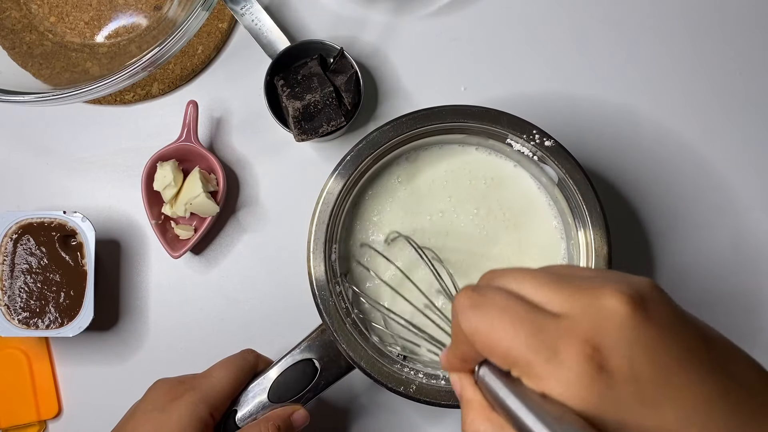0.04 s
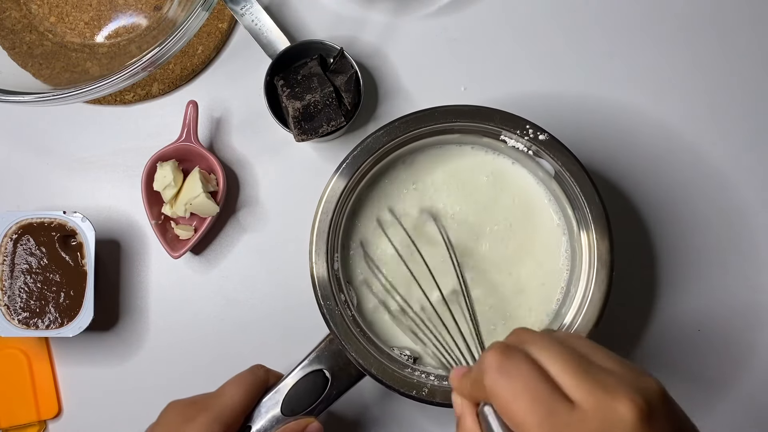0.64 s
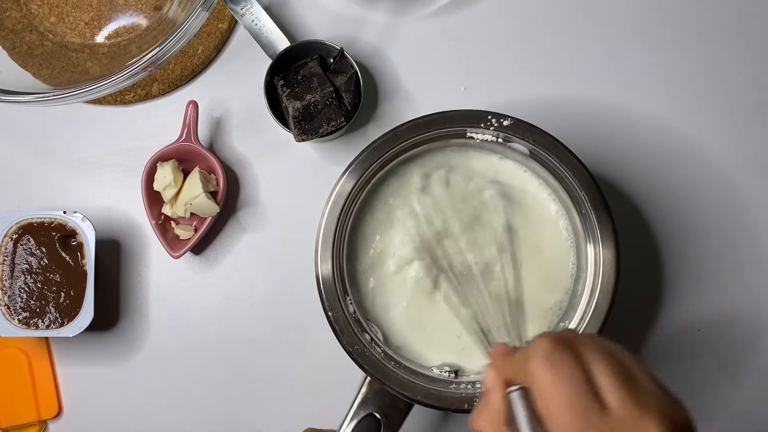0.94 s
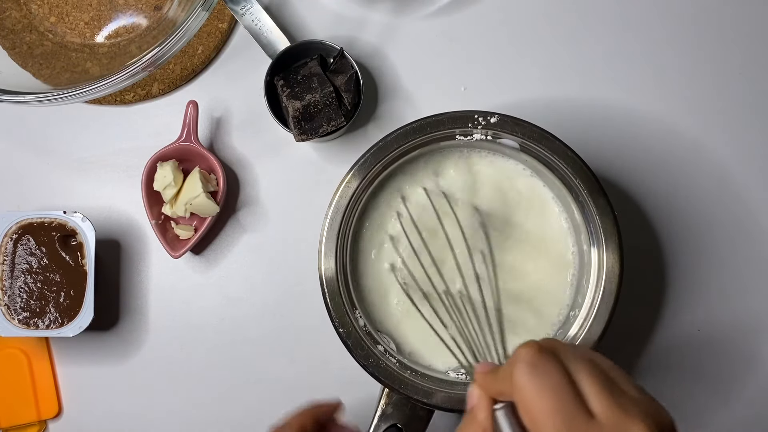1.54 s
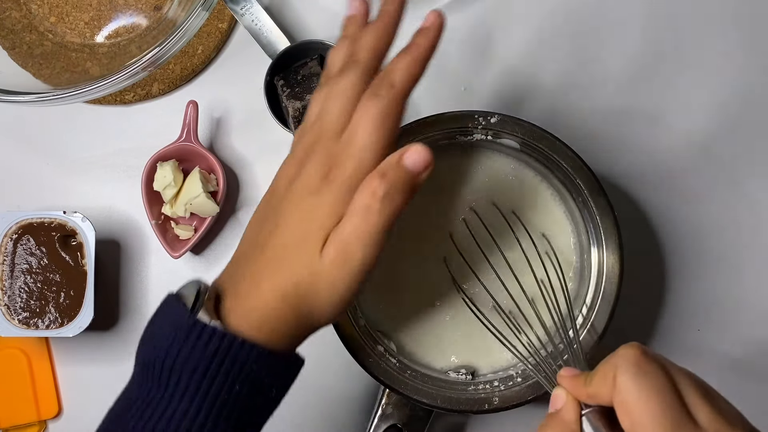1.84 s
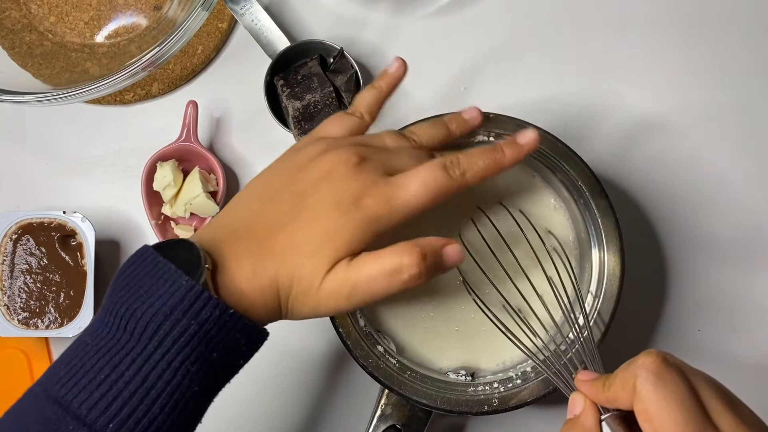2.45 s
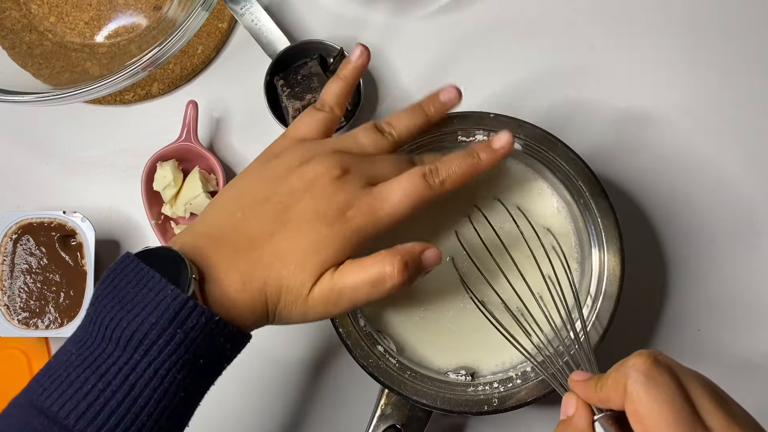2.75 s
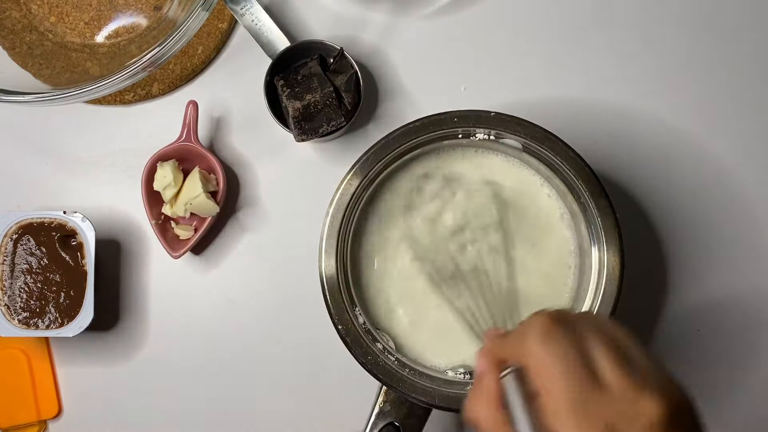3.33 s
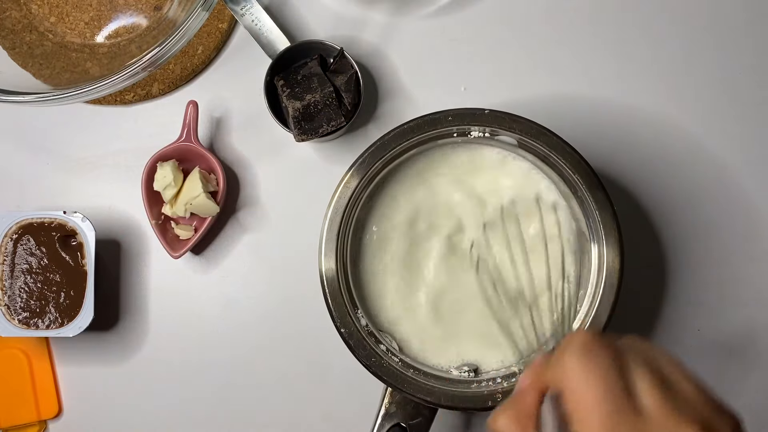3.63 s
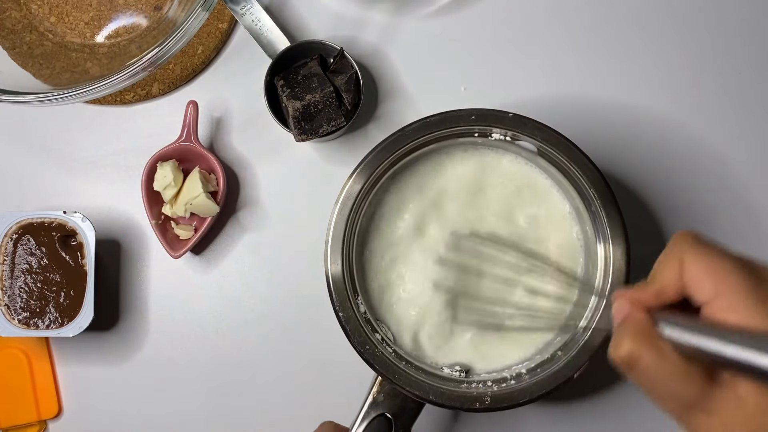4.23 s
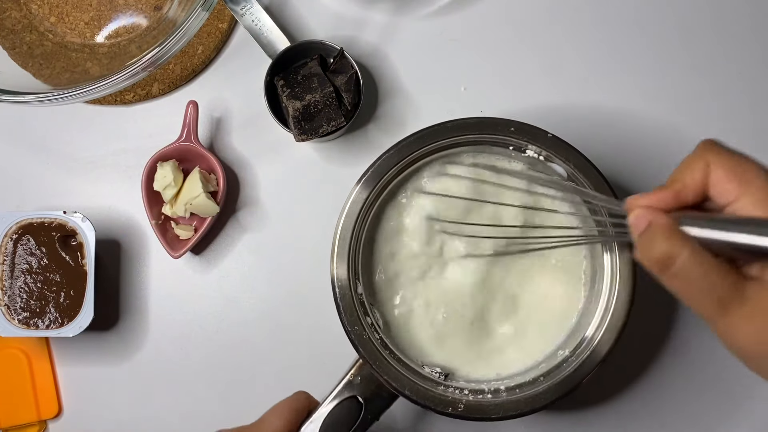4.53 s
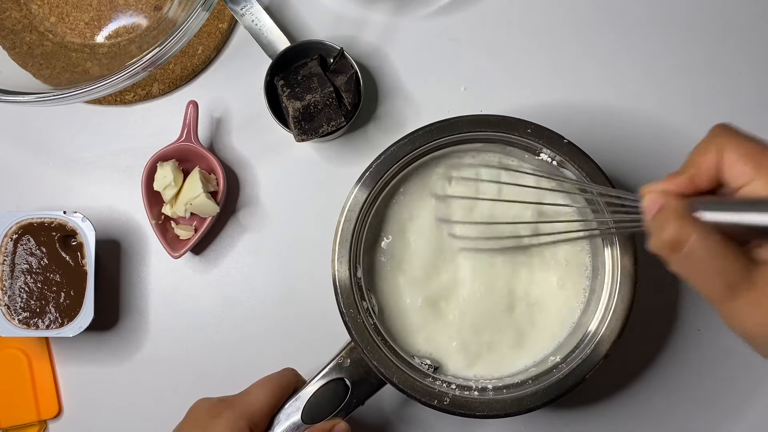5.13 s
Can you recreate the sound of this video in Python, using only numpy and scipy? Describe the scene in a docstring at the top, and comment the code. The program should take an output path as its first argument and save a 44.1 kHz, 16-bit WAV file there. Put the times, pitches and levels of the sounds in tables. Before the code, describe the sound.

A wire whisk stirs sauce in a steel saucepan, clacking and scraping quickly, with a short pause midway.

```python
"""A kitchen worktop, close by: a wire whisk stirs a milky sauce in a steel saucepan.
About four times a second an impact on the wall excites the damped modes of pan and wire loops.
Between impacts, the wires scrape the bottom by stick-slip friction and churn the sauce.
The blows drive a soft, low boom in the worktop. Midway the stirring stops for about a second,
and the resting whisk only ticks and rubs."""
import sys
import numpy as np
from scipy import signal
from scipy.fft import rfft, irfft, next_fast_len
from scipy.io import wavfile
from scipy.ndimage import uniform_filter1d

SR = 44100
rng = np.random.default_rng(int(sys.argv[2]) if len(sys.argv) > 2 else 0)


def log_audio(samples):
    """Write samples as a 16-bit WAV file to the path given in sys.argv[1]."""
    # one column per channel
    frames = np.atleast_2d(samples).T
    # limit to full scale, then quantise
    limited = np.clip(frames, -1, 1)
    pcm = np.round(limited * 32767).astype(np.int16)
    wavfile.write(sys.argv[1], SR, pcm)


N = 237238
TIME = np.arange(N) / SR

# The impact that opens each turn: t/s, wall level/dB, wire level/dB, tick level/dB, wall f/Hz,
# wall T60/s (referred to WALL_HZ), favoured overtone f/Hz, lag of the trailing wires/s,
# their relative level/dB, worktop level/dB, worktop rise time/s
STROKES = [(.399, -50, -45.5, -54, 1108, 0.048, 3600, .014, 1.5, -44, 0.051),
           (.758, -42.5, -40, -38.5, 1110, .056, 4300, 0.029, -4, -42.5, 0.042),
           (.998, -46.5, -38, -39, 1050, 0.052, 5340, 0.037, -1.5, -37, 0.081),
           (1.23, -36, -35, -29.5, 1052, 0.045, 5500, 0.0088, -6, -32.5, 0.082),
           (1.455, -33, -27.5, -25.5, 1100, .056, 5070, .004, -23, -27, 0.055),
           (2.963, -48, -33, -26.5, 940, 0.048, 4100, 0.0074, -6, -46, 0.043),
           (3.16, -42, -37.5, -28.5, 1096, 0.087, 5870, 0.0038, -2.5, -32.5, 0.056),
           (3.384, -37, -36, -32, 1096, 0.052, 1700, .005, -1, -66, 0.021),
           (3.631, -36.5, -44, -36.5, 1067, .056, 1680, 0.012, -1.5, -32, 0.062),
           (3.857, -38, -36.5, -35, 1054, 0.072, 1730, .007, -10.5, -37.5, 0.054),
           (4.077, -28, -33, -25.5, 1113, 0.076, 8260, .0042, -21, -31, 0.048),
           (4.381, -36.5, -35, -34.5, 1104, 0.043, 1610, .046, -7, -25, 0.085),
           (4.604, -32, -29, -26.5, 1330, 0.02, 5240, 0.0078, -6, -38, 0.04),
           (4.785, -50, -43.5, -30, 1286, .03, 11400, 0.026, -9.5, -50, 0.076),
           (5.022, -31.5, -33.5, -28, 1290, 0.042, 10100, .0085, -7.5, -38, 0.021),
           (5.218, -40.5, -40, -37.5, 1170, 0.028, 12400, .011, 6.5, -41.5, 0.046)]
# Light touches of single wires: t/s, wire level/dB, favoured overtone f/Hz, worktop level/dB
TOUCHES = [(0.027, -33, 3300, -46.5), (.118, -44.5, 1890, -53), (.21, -44, 3640, -53),
           (.302, -53, 2250, -60), (.466, -42, 3970, -51), (1.617, -51, 2550, -35), (1.786, -44, 1620, -69),
           (1.994, -54, 4800, -35), (2.139, -56.5, 5070, -34.5), (2.346, -65, 2560, -41.5),
           (2.642, -61.5, 2580, -44.5), (3.459, -39, 3000, -45), (4.19, -39.5, 1600, -42.5)]
# Normal modes of the steel pan: f/Hz, level/dB, T60/s
PAN_MODES = [(560.4, -29.5, 0.38), (1636, -12.5, 0.069), (1803, -15.5, 0.054), (2070, -8.5, 0.045),
             (2512, -14, 0.043), (3143, -11.5, 0.023), (4030, -20.5, 0.027), (5477, 2, 0.0079),
             (10930, -8, 0.017)]
# Dense modes of the wire loops: f/Hz
WIRE_HZ = np.geomspace(1400, 15500, num=90) * rng.uniform(.98, 1.02, 90)
# Long, thin ringing tones of the whisk's free wire loops: f/Hz
LOOP_RING_HZ = [873, 1519, 2009, 2660, 2932, 3965]
# Vigour of the hand (slow start, rest, brisk turns): t/s, level/dB
VIGOUR = [(0, -49), (.3, -58.5), (.6, -52.5), (1.05, -44), (1.35, -40.5), (1.53, -54), (1.68, -46.5),
          (1.86, -77), (2.89, -90), (2.96, -43), (3.3, -44.5), (3.55, -36.5), (4.0, -43), (4.28, -43.5),
          (4.7, -42), (5.38, -42)]
# Wires sliding slowly: centre t/s, level/dB, duration/s, favoured overtone f/Hz, tilt/(dB per octave)
RUBS = [(2.251, -70.5, 0.046, 1600, -4.5), (2.461, -60, 0.04, 2590, 5)]
# Wires slapping through the surface: t/s, level/dB, favoured f/Hz
SPLATS = [(0.646, -49.5, 1690), (1.128, -44.5, 1340), (3.268, -42, 1490), (3.531, -38.5, 1630),
          (3.734, -38, 1580), (3.984, -39.5, 1700), (4.812, -36, 1270), (5.133, -41.5, 2000),
          (5.283, -37.5, 1150)]
# Pairs of pan tones brought out by the sloshing sauce: centre t/s, level/dB, lower f/Hz, duration/s
GURGLES = [(1.641, -48, 520, 0.016), (3.081, -44, 2022, 0.04), (3.531, -38, 1570, 0.085),
           (3.768, -40.5, 1609, 0.049), (4.023, -42.5, 1805, 0.039)]
# Spectral envelopes of the sources: f/Hz, relative level/dB
CONTACT_SPECTRUM = [(100, -12), (750, -7), (1200, -7.5), (5500, 1), (8500, 3.5), (10000, -2.5),
                    (12200, 2.5), (16000, -12.5)]
CHURN_SPECTRUM = [(300, -2), (750, -7.5), (1150, 4.5), (2000, 1), (4400, 0), (6000, -6.5), (12000, -83)]
SCRAPE_SPECTRUM = [(1000, -27), (3400, -11), (5300, 12.5), (7000, 4.5), (12000, 3), (16000, -6.5)]
RUB_SPECTRUM = [(1000, -11), (2800, 4), (12000, 7.5)]
SLOSH_SPECTRUM = [(100, 9.5), (500, -12.0), (2000, -64.0)]
AMBIENT_SPECTRUM = [(55, -4.5), (100, -2.5), (170, -11.5), (500, -21.5), (1200, -39), (5000, -45.5),
                    (11000, -44), (16000, -65)]
# Reverberation time of the kitchen: f/Hz, T60/s
ROOM_T60 = [(1100, 0.16), (2500, 0.18), (16000, 0.19)]
# Reflections that differ at the two microphone ports: f/Hz, relative level/dB
SIDE_SPECTRUM = [(100, -30), (250, -6), (600, -3), (1100, -15), (1900, -12), (2700, -3), (4600, -5),
                 (5500, -14)]
# Phase lead of the left port over the right: f/Hz, phase/rad
LEFT_LEAD = [(2700, 0), (3300, .7), (4900, .15), (7300, 3.1), (13400, 9.4), (16000, 12.6)]
# Level of the left port over the right: f/Hz, level/dB
LEFT_BALANCE = [(320, 0.53), (2000, -0.0094)]

WALL_HZ, TRAILING_WALL_HZ = 1143, 1075  # wall pitch under a light touch and under the trailing wires


def whisk(trailing_wall_db=-3, touch_wall_db=-16.5, touch_wall_t60=0.036):
    """Impact excitation: leading, then trailing wires strike in each turn; light touches fall between."""
    out = np.zeros(N)
    for s, wall_db, wire_db, tick_db, wall_hz, t60, overtone_hz, lag_s, trailing_db, _, _ in STROKES:
        add(out, s, clack(wall_db, wire_db, tick_db, wall_hz, t60, overtone_hz))
        trailing = clack(wall_db + trailing_wall_db, wire_db, tick_db, TRAILING_WALL_HZ, t60, overtone_hz)
        add(out, s + lag_s, gain_of(trailing_db) * trailing)
    for s, wire_db, overtone_hz, _ in TOUCHES:
        tick_db = wire_db - 15.5 + 7.5 * np.log2(overtone_hz / WALL_HZ)  # higher overtone, louder tick
        add(out, s, clack(wire_db + touch_wall_db, wire_db, tick_db, WALL_HZ, touch_wall_t60, overtone_hz))
    return out


def clack(wall_db, wire_db, tick_db, wall_hz, wall_t60, overtone_hz, split_hz=4800, wobble=0.044):
    """Damped free vibration after one blow: a bright tick, a clatter of wires and the tone of the wall."""
    t = np.arange(SR // 4) / SR
    spectrum = favouring(CONTACT_SPECTRUM, overtone_hz)
    contact = rng.standard_normal(len(t)) * gain_of(2 * wander(700, t))
    freedom = np.interp(wire_db, [-60, -48], [3, 1])  # a light touch lets the loops ring longer
    metal = wire_modes(t, t60=.04 * freedom) + gain_of(1) * pan_modes(t, scatter_db=3)
    tick = band(colour(contact * decay(t, t60=.024) + metal, spectrum), split_hz, "high")
    tick *= attack(t, .0007)
    clatter = band(colour(contact * decay(t, t60=.045) + metal, spectrum), split_hz, "low")
    clatter *= attack(t, .0025)
    # The sloshing mass load pulls the wall's pitch about.
    cycles = np.cumsum(wall_hz * (1 + wobble * wander(150, t))) / SR
    wall_t60 *= (WALL_HZ / wall_hz) ** .5  # higher pitches die sooner
    wall = np.sin(2 * np.pi * cycles) * decay(t, wall_t60) * attack(t, .0028)
    parts = (wall_db, wall), (wire_db, clatter), (tick_db, tick)
    return sum(gain_of(db) * part / part[t < .015].std() for db, part in parts)


def wire_modes(t, t60):
    """Modal superposition: each of the loops' many modes rings with a random strength and phase."""
    strength, phase, detune = rng.standard_normal((3, len(WIRE_HZ), 1))
    hz = WIRE_HZ[:, None] * (1 + detune / 40)
    modes = gain_of(3 * strength) * np.sqrt(hz) * np.sin(2 * np.pi * (hz * t + phase))
    return evened(modes.sum(0)) * decay(t, t60)


def pan_modes(t, scatter_db, t60_scale=1, load_share=0.011):
    """Normal modes of the pan: the point of impact sets their strengths, the liquid load detunes them."""
    ring = np.zeros(len(t))
    for hz, db, t60 in PAN_MODES:
        strength, detune, phase = rng.standard_normal(3)
        tone = np.sin(2 * np.pi * (hz * (1 + load_share * detune) * t + phase))
        ring += gain_of(db + scatter_db * strength) * decay(t, t60 * t60_scale) * tone
    return ring


def stirring(splash_db=-4, bubble_db=-8, scrape_db=-3, ring_db=-7, flicker_db=7, drag_db=-3):
    """Drag churns the sauce; stick-slip friction on the bottom drives now one pan mode, now another."""
    liquid = gain_of(splash_db) * evened(colour(impulses(per_s=1300), CHURN_SPECTRUM))
    liquid += gain_of(bubble_db) * bubbles(per_s=1300)
    slips = impulses(per_s=1100)
    scrape = gain_of(scrape_db) * evened(colour(slips, SCRAPE_SPECTRUM))
    ring = np.zeros(N)
    for hz, db, t60 in PAN_MODES:
        if hz < 5000:
            strength = gain_of(db / 2 + flicker_db * np.tanh(wander(per_s=30)))
            ring += strength * resonance(slips, hz, width_hz=4 / t60)
    sound = shifting_resonances(liquid + scrape) + gain_of(ring_db) * evened(ring)
    return gain_of(drag_db + sweep_db()) * sound


def sweep_db(fastest_share=0.26, dip_db=-3.5):
    """Amplitude modulation by wire speed: the hand's vigour, with one swell in each turn."""
    turns = np.interp(TIME, [row[0] for row in STROKES], np.arange(len(STROKES)))
    slowing = np.sin(np.pi * (turns - fastest_share)) ** 4
    return np.interp(TIME, *np.transpose(VIGOUR)) + dip_db * slowing


def shifting_resonances(x, narrow_db=5, wide_db=2.8):
    """Time-varying filtering: resonances come and go as the wires change their hold on pan and liquid."""
    frames = dict(nperseg=512, noverlap=384)
    spectra = signal.stft(x, **frames)[2]
    narrow, wide = rng.standard_normal((2, *spectra.shape))
    narrow = evened(uniform_filter1d(uniform_filter1d(narrow, size=2, axis=0), size=10, axis=1))
    wide = evened(uniform_filter1d(uniform_filter1d(wide, size=60, axis=0), size=7, axis=1))
    spectra *= gain_of(narrow_db * narrow + wide_db * wide)
    return evened(signal.istft(spectra, **frames)[1][:N])


def bubbles(per_s, decay_cycles=1.6, rise=0.0073, sizes=36):
    """Bubble resonance: small air volumes of many sizes each give a short, slightly rising ring."""
    out, t = np.zeros(N), np.arange(SR // 16) / SR
    for hz in np.geomspace(1150, 4200, sizes):
        age = t * hz / decay_cycles
        ping = np.sin(2 * np.pi * hz * t * (1 + rise * age)) * np.exp(-age) * attack(age, 1 / 8)
        out += signal.oaconvolve(impulses(per_s / sizes), ping)[:N]
    return evened(out)


def splats(decay_s=0.013):
    """Drop impacts: each sudden spray is a burst of noise with an exponential decay."""
    out, t = np.zeros(N), np.arange(SR // 8) / SR
    for s, db, hz in SPLATS:
        drops = rng.standard_normal(len(t)) * rng.exponential(1, len(t))
        spray = colour(drops * np.exp(-t / decay_s), favouring(CHURN_SPECTRUM, hz))
        spray = band(spray, hz / 2, "high")
        add(out, s, gain_of(db) * spray / spray[t < decay_s].std())
    return out


def gurgles(glide=0.01104, upper_db=-7, waver=0.011, lumpy_db=4):
    """Modal excitation: the sloshing sauce brings out two wavering, lumpy tones of the pan."""
    out, t = np.zeros(N), np.arange(SR // 4) / SR
    from_centre = t - 1 / 8
    for s, db, hz, length in GURGLES:
        swell, sound = np.exp(-(2 * from_centre / length) ** 2), 0
        rise = glide * np.tanh(from_centre / length)
        for ratio, size in ((1, 0.87), (1.15, gain_of(upper_db))):
            drift, lumps = (np.interp(t * 130, np.arange(64), row) for row in rng.standard_normal((2, 64)))
            cycles = np.cumsum(ratio * hz * (1 + rise + waver * drift)) / SR
            sound += size * swell * gain_of(lumpy_db * lumps) * np.sin(2 * np.pi * cycles)
        add(out, s - 1 / 8, gain_of(db) * evened(sound) * np.sqrt(np.mean(swell ** 2)))
    return out


def rubs():
    """Stick-slip friction: a slowly sliding wire keeps the loops and the pan ringing softly."""
    out, t = np.zeros(N), np.arange(SR // 4) / SR
    for s, db, length, overtone_hz, tilt in RUBS:
        spectrum = [(hz, level + tilt * np.log2(hz / overtone_hz)) for hz, level in RUB_SPECTRUM]
        swell = np.exp(-(2 * (t - 1 / 16) / length) ** 2)
        metal = evened(wire_modes(t, t60=.07)) + evened(pan_modes(t, scatter_db=2, t60_scale=1.5))
        friction = swell * rng.standard_normal(len(t))
        sound = colour(signal.fftconvolve(friction, metal)[:len(t)], favouring(spectrum, overtone_hz))
        add(out, s - 1 / 16, gain_of(db) * evened(sound) * np.sqrt(np.mean(swell ** 2)))
    return out


def long_loop_ring(x, level_db=-12, t60=0.3):
    """Lightly damped resonance: knocks and scrapes keep long, thin tones of the whisk's free wire loops
    ringing."""
    t = TIME[:SR]
    ring = sum(np.sin(2 * np.pi * hz * t) for hz in LOOP_RING_HZ) * decay(t, t60)
    return gain_of(level_db) * convolved(x, ring)


def worktop(hz=70, t60=0.76, touch_rise_s=0.049, width_share=0.39, slosh_db=-15, slosh_slope=0.077):
    """Structure-borne sound: a low mode swells and dies after each blow; the sauce adds a dull rumble."""
    pushes = [(s, db, rise_s) for s, *_, db, rise_s in STROKES]
    pushes += [(s, db, touch_rise_s) for s, *_, db in TOUCHES]
    energy = np.zeros(N)
    for s, db, rise_s in pushes:
        from_peak = TIME - s - rise_s
        swell = np.exp(-.5 * (from_peak / (width_share * rise_s)) ** 2)
        tail = 0.31 * decay(abs(from_peak), t60) * (from_peak > 0)
        energy += (gain_of(db) * np.maximum(swell, tail)) ** 2
    swing = np.sqrt(2) * np.sin(2 * np.pi * np.cumsum(hz * (1 + 0.074 * wander(per_s=45))) / SR)
    rumble = evened(colour(band(rng.standard_normal(N), 43, "high"), SLOSH_SPECTRUM))
    pan_body = 0.51 * resonance(rng.standard_normal(N), hz=230, width_hz=21)
    speed_db = sweep_db()
    slosh = gain_of(slosh_db + slosh_slope * (speed_db - speed_db.max()))
    return np.sqrt(energy / 2) * (swing + slosh * (rumble + pan_body))


def reverberation(x):
    """Diffuse field of the kitchen: each band decays exponentially at its own rate."""
    hz, t, spectra = signal.stft(rng.standard_normal(SR * 3 // 4), SR, nperseg=256)
    tail = signal.istft(spectra * decay(t, read(ROOM_T60, hz)[:, None]), SR, nperseg=256)[1]
    return convolved(x, tail * attack(np.arange(len(tail)) / SR, .0005))


def ambient_rumble():
    """Stationary background noise of the kitchen, strongest in the bass."""
    return evened(band(colour(rng.standard_normal(N), AMBIENT_SPECTRUM), 43, "high"))


def microphone_ports(x, scatter_s=.016):
    """Two channels: near reflections differ at the two ports, and in the treble the left channel leads the
    right in phase."""
    t = np.arange(SR // 8) / SR
    reflections = rng.standard_normal(len(t)) * np.exp(-t / scatter_s)
    side = colour(convolved(band(x, 160, "high"), reflections), SIDE_SPECTRUM)
    size = next_fast_len(N + SR // 10)
    hz = np.fft.rfftfreq(size, 1 / SR)
    # Each port takes half of the difference in phase and level.
    half = np.exp(.5j * np.interp(hz, *np.transpose(LEFT_LEAD))) * gain_of(read(LEFT_BALANCE, hz) / 2)
    left = irfft(rfft(x + side, size) * half, size)
    right = irfft(rfft(x - side, size) / half, size)
    return np.array([left, right])[:, :N]


def favouring(points, overtone_hz, peak_db=7.5, width_octaves=0.12, uneven_db=3.5):
    """Selective excitation: the point of contact raises one band and leaves the rest a little uneven."""
    hz = np.geomspace(300, 16000, num=50)
    peak = peak_db * np.exp(-.5 * (np.log2(hz / overtone_hz) / width_octaves) ** 2)
    return np.transpose([hz, read(points, hz) + peak + uneven_db * rng.standard_normal(len(hz))])


def impulses(per_s, spread_db=4):
    """Shot noise: random clicks, mostly small and a few large."""
    clicks = (rng.random(N) < per_s / SR) * rng.choice([-1, 1], N)
    return clicks * gain_of(spread_db * np.minimum(rng.exponential(1, N), 4))


def wander(per_s, t=TIME):
    """Random modulation: straight lines between values of unit variance."""
    return np.interp(t * per_s, np.arange(len(t)), rng.standard_normal(len(t)))


def resonance(x, hz, width_hz):
    """Forced response of a single mode, at unit rms."""
    return evened(signal.lfilter(*signal.iirpeak(hz, hz / width_hz, fs=SR), x))


def colour(x, points, size=2048):
    """Minimum-phase filter with the given spectrum, so that clicks keep their sharp front."""
    log_gain = np.log(gain_of(read(points, abs(np.fft.fftfreq(size, 1 / SR)))))
    response = np.fft.ifft(np.exp(np.conj(signal.hilbert(log_gain)))).real
    return signal.fftconvolve(x, response[:size // 2])[:len(x)]


def convolved(x, response):
    """Convolution with an impulse response scaled to unit energy."""
    return signal.fftconvolve(x, response / np.linalg.norm(response))[:N]


def band(x, hz, kind):
    """Third-order low-pass or high-pass."""
    return signal.sosfilt(signal.butter(3, hz, kind, fs=SR, output="sos"), x)


def read(points, hz):
    """Linear interpolation of a table over log frequency."""
    f, value = np.transpose(points)
    return np.interp(np.log(hz + 1), np.log(f + 1), value)


def attack(t, time_constant):
    """Exponential approach to full amplitude."""
    return 1 - np.exp(-t / time_constant)


def decay(t, t60):
    """Exponential damping, 60 dB in t60."""
    return gain_of(-60 * t / t60)


def gain_of(db):
    """Amplitude ratio of a level in decibels."""
    return 10 ** (np.asarray(db) / 20)


def evened(x):
    """Normalisation to unit rms."""
    return x / np.sqrt(np.mean(x ** 2) + 1e-20)


def add(mix, s, sound):
    """Superposition of a sound on the mix from time s."""
    part = mix[max(round(s * SR), 0):][:len(sound)]
    part += sound[:len(part)]


def scene(direct_db=-1.14, room_db=-10, ambient_db=-57):
    """Superposition at the microphone: the pan, its reverberation, the worktop and the background."""
    whisking = whisk() + rubs() + stirring()
    pan = whisking + long_loop_ring(whisking) + splats() + gurgles()
    background = gain_of(ambient_db) * ambient_rumble()
    airborne = gain_of(direct_db) * pan + gain_of(room_db) * reverberation(pan)
    return microphone_ports(airborne + worktop() + background)


def record(dry, low_cut_hz=35, high_cut_hz=16100):
    """Band limiting: zero-phase filters remove the deepest bass and the highest treble."""
    dry = signal.sosfiltfilt(signal.butter(3, low_cut_hz, "high", fs=SR, output="sos"), dry)
    low_pass = signal.firwin(301, high_cut_hz, window=("kaiser", 8), fs=SR)
    return signal.oaconvolve(dry, low_pass[None], "same")


dry = scene()
out = record(dry)
log_audio(out)
```